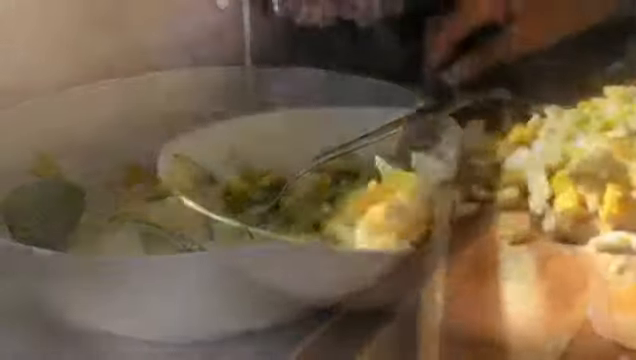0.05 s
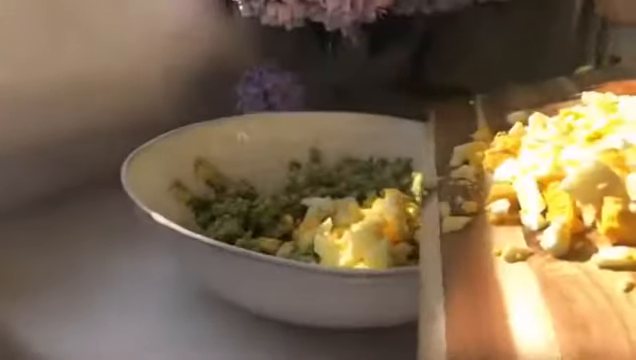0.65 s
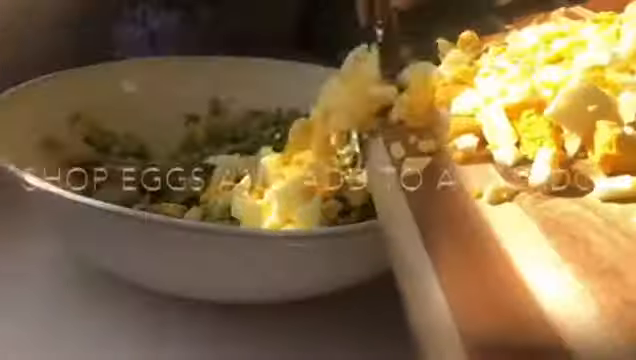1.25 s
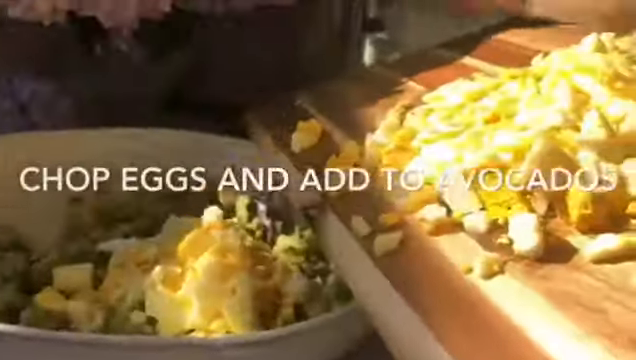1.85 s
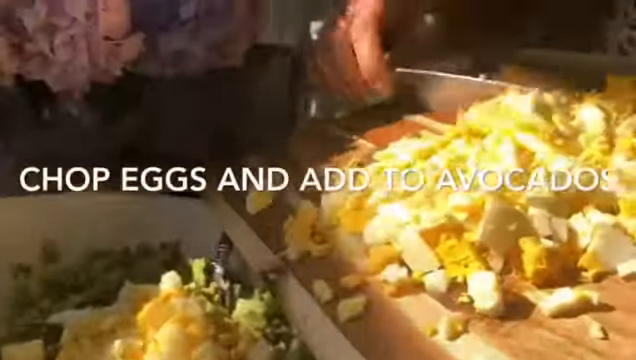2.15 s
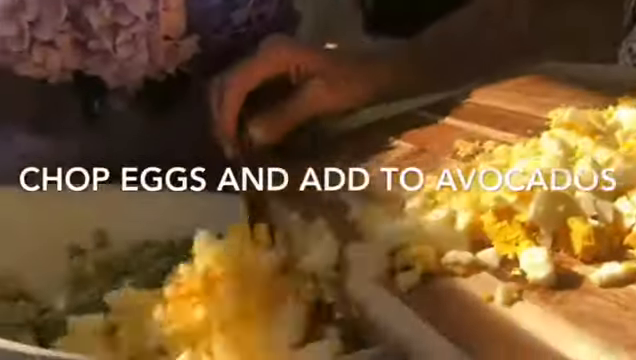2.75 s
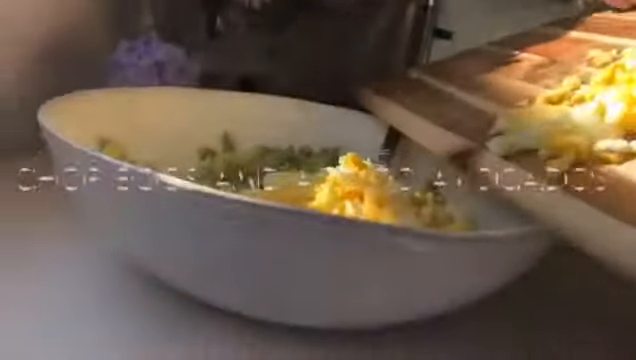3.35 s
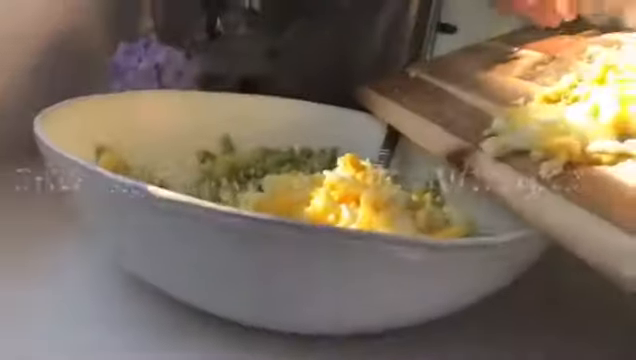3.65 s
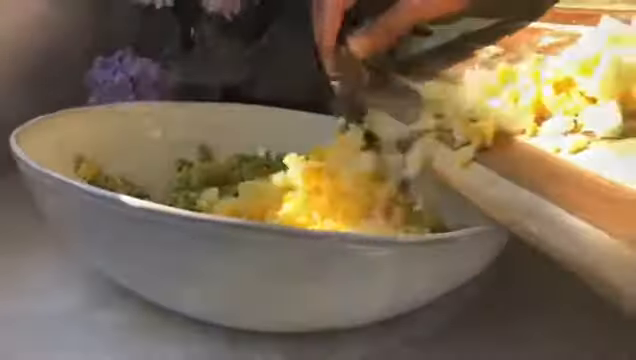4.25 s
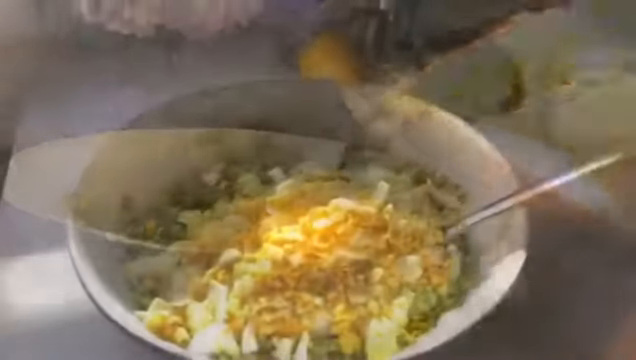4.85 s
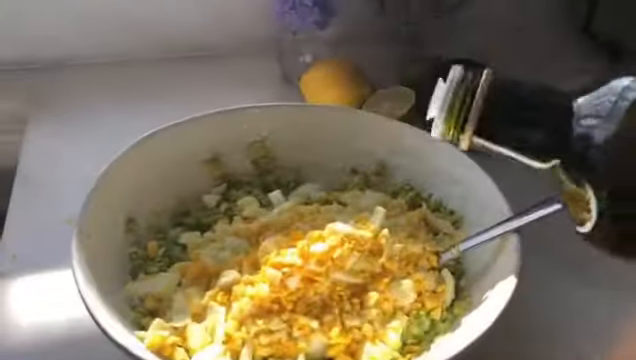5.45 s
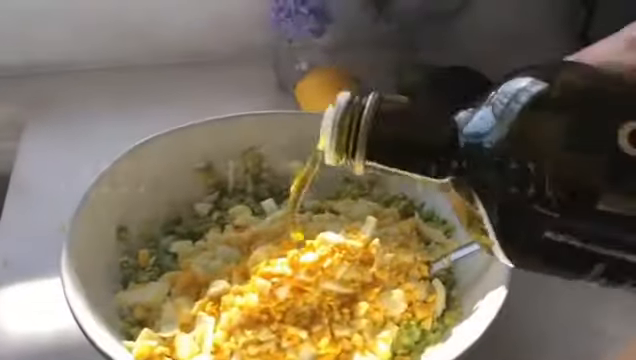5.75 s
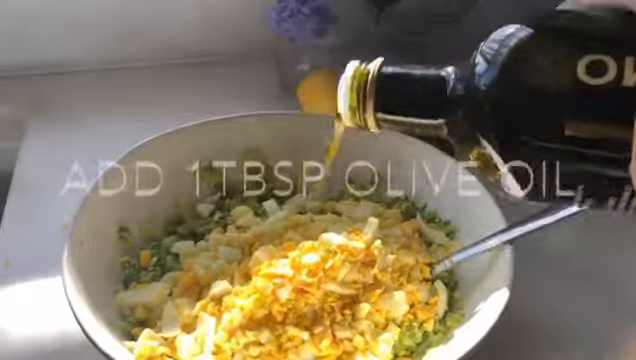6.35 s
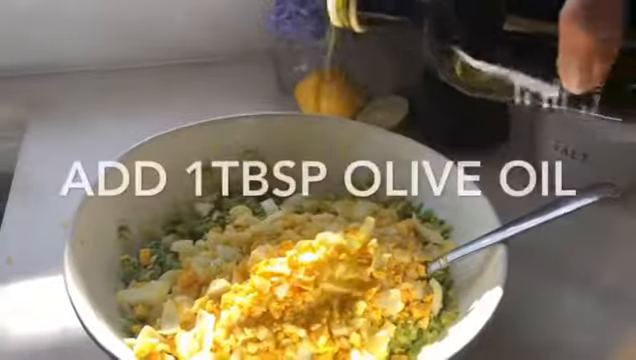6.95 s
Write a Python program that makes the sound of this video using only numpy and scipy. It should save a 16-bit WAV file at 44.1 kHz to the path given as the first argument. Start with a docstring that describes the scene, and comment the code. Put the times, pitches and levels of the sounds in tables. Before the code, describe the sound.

Close, rasping knife scrapes and sharp knocks on a wooden cutting board, with moist egg dropping into a bowl.

```python
"""In a small kitchen, close by, a knife pushes chopped egg off a wooden board into a bowl.
The blade lands with a hard knock, then catches on the wood fibres, so that it rasps and squeaks
and both wood and steel ring. Soft lumps drop into the bowl with wet smacks. Near the end only
a few tiny wet ticks are left over the low rumble and hollow drone of the room."""
import sys
import numpy as np
from scipy import signal
from scipy.fft import rfft, irfft, next_fast_len
from scipy.io import wavfile
from scipy.ndimage import uniform_filter1d, minimum_filter1d, map_coordinates

SR = 44100
rng = np.random.default_rng(int(sys.argv[2]) if len(sys.argv) > 2 else 0)


def to_wav(sig):
    """Store sig (one row per channel, or 1-D mono) as 16-bit WAV at the path in sys.argv[1].

    Samples outside -1..1 are clipped; the rate is SR.
    """
    pcm = np.clip(np.atleast_2d(sig), -1, 1) * 32767
    pcm = np.round(pcm).astype(np.int16)
    wavfile.write(sys.argv[1], SR, pcm.T)  # frames by channels


N = 316879
TIME = np.arange(N) / SR


def from_db(db):
    """Turn decibels into a number to multiply by."""
    return 10 ** (np.asarray(db) / 20)


def rms_one(x):
    """Scale a sound so that its average power is 1."""
    return x / np.sqrt(np.mean(x ** 2) + 1e-20)


def cut(x, hz, kind, order=2):
    """Keep the "low" or the "high" side of hz."""
    return signal.sosfilt(signal.butter(order, hz, kind, fs=SR, output="sos"), x + 1e-18)


def resonate(x, hz, width_hz):
    """Ring at one pitch; the narrower the width, the longer the ring."""
    r = np.exp(-np.pi * width_hz / SR)
    feedback = [1, -2 * r * np.cos(2 * np.pi * hz / SR), r * r]
    return signal.lfilter(np.array([1, 0, -1]) * (1 - r * r) / 2, feedback, x + 1e-18)


def body(x, modes):
    """An object rings at several pitches of its own, its modes; every second one is flipped in sign."""
    return sum((-1) ** k * from_db(db) * resonate(x, hz, width)
               for k, (hz, width, db, *_) in enumerate(modes))


def drift(per_s):
    """A random wobble that takes per_s new values a second."""
    return np.interp(TIME * per_s, np.arange(4000), rng.standard_normal(4000))


def burst(start, fade_s):
    """A level that jumps up at start and dies away."""
    out, at = np.zeros(N), round(start * SR)
    out[at:at + SR // 2] = np.exp(-TIME[:min(SR // 2, N - at)] / fade_s)
    return out


def grit(per_s, spread_db):
    """Many tiny clicks of uneven size at random times."""
    sizes = from_db(spread_db * np.minimum(rng.exponential(1, N), 4)) * rng.choice([-1, 1], N)
    return sizes * (rng.random(N) < per_s / SR)


def level_curve(points):
    """A level that slides from one (time, dB) point to the next."""
    return from_db(np.interp(TIME, *np.transpose(points)))


# how strong the air noise is from low to high: f/Hz, level/dB
AIR_COLOUR = [(25, -29), (50, -4.5), (90, -4.5), (200, -13), (280, -12), (420, -15), (700, -24),
              (1000, -24), (1500, -32), (2200, -36.5), (3000, -37.5), (5300, -43.5), (7000, -44),
              (12000, -48.5)]
# the background hiss dips briefly, then stays a little quieter: t/s, level/dB
AIR_LEVELS = [(0, -50), (1.5, -51.5), (4.3, -50.5), (4.7, -55.5), (5.2, -53), (7.19, -53)]
def air():
    """The still air of the kitchen is a dull, soft noise."""
    hz, db = np.transpose(AIR_COLOUR)
    size = next_fast_len(N)
    colour = from_db(np.interp(np.log(np.fft.rfftfreq(size, 1 / SR) + 1), np.log(hz), db))
    noise = irfft(rfft(rng.standard_normal(size)) * colour, size)[:N]
    return level_curve(AIR_LEVELS) * rms_one(cut(noise, 28.95, "high"))


# the deep pitches in the rumble: f/Hz, width/Hz, level/dB
RUMBLE_MODES = [(56, 10, 1), (137.4, 32, 1), (109, 20.8, -7.5)]
# its rise and fall: t/s, level/dB
RUMBLE_LEVELS = [(0, -55), (0.7, -49.5), (2.8, -50), (4.1, -46.5), (4.7, -53.5), (7.19, -55)]
def rumble():
    """A low rumble swells and sinks again."""
    deep = cut(body(rng.standard_normal(N), RUMBLE_MODES), 200, "low")
    return level_curve(RUMBLE_LEVELS) * rms_one(cut(deep, 42, "high", order=4))


# low pitches at which the room rings: f/Hz, width/Hz, level/dB
DRONE_MODES = [(135, 12, 3.5), (261, 25, -1.5), (295, 25, -5), (362, 36, -3.5)]
# the drone comes up toward the end: t/s, level/dB
DRONE_LEVELS = [(0, -74.5), (4.6, -70.5), (5.2, -53), (7.19, -55.5)]
def drone():
    """Noise ringing in the room makes a hollow drone."""
    hollow = cut(body(rng.standard_normal(N), DRONE_MODES), 450, "low", order=4)
    return level_curve(DRONE_LEVELS) * rms_one(hollow)


def kitchen(x, tail_db, low_t60_s=.5, high_t60_s=.37):
    """Add quick echoes off worktop and bowl, then the room's tail; t60 is the time to fade by 60 dB."""
    t = TIME[:SR // 2]
    noise = rng.standard_normal((3, len(t)))
    early = noise[0] * (t > .003) * np.exp(-t / .0095)
    low_fade, high_fade = from_db(-60 * t / low_t60_s), from_db(-60 * t / high_t60_s)
    tail = cut(noise[1], 3000, "low") * low_fade + cut(noise[2], 3000, "high") * high_fade
    tail *= (t > .008) / np.linalg.norm(low_fade)
    echoes = from_db(-16) * early / np.linalg.norm(early) + from_db(tail_db) * tail
    return x + signal.fftconvolve(x, echoes)[:N]


# pitches that linger in the room, lowest first: f/Hz, t60/s, level/dB
LINGERING_PITCHES = [(250, .35, 1), (571, .5, 3), (1358, .45, -5), (2385, .4, -1), (2470, .4, -7),
                     (4040, .3, -4), (5270, .3, -4), (6680, .4, -8), (6968, .4, -7), (10145, .2, -4)]
def linger(x, lowest=None):
    """The pitches of board and blade linger in the room after the knife stops."""
    return x + sum(from_db(db) * resonate(x, hz, np.log(1000) / (np.pi * t60))
                   for hz, t60, db in LINGERING_PITCHES[:lowest])


def squelches(rows, relative_width, pops_per_s):
    """Each wet sound is a fading cluster of tiny pops around one pitch."""
    pops, out = grit(pops_per_s, spread_db=2.5), np.zeros(N)
    for start, db, hz, fade_s in rows:
        width = hz * relative_width
        cluster = resonate(pops * burst(start, fade_s), hz, width)
        out += from_db(db) * cluster / np.std(resonate(pops[:SR], hz, width))
    return out


# tiny wet ticks in the bowl: t/s, level/dB, f/Hz, fade/s
WET_TICKS = [(4.7538, -65.5, 2960, 0.0044), (5.785, -63, 4800, 0.0071), (5.80, -63, 2000, .008),
             (6.1905, -58.5, 5000, 0.0033), (6.192, -62.5, 3330, 0.0046), (6.7767, -62, 2010, 0.0062)]
def ticks():
    """Little air pockets pop in the oily food."""
    return squelches(WET_TICKS, relative_width=.053, pops_per_s=26000)


# smacks of egg: t/s, level/dB, f/Hz, fade/s
EGG_SMACKS = [(2.33, -55.5, 4440, 0.066), (2.943, -46, 2443, 0.052), (2.946, -53, 4720, 0.075),
              (3.015, -60.5, 5020, 0.0092), (3.096, -55, 5476, .008), (4.2205, -43.5, 4200, 0.0044),
              (4.415, -66, 5980, .06)]
def smacks():
    """Wet egg makes short, bright smacks."""
    return cut(squelches(EGG_SMACKS, relative_width=.52, pops_per_s=4000), 7000, "low", order=4)


# falling lumps: t/s, level/dB, f/Hz, fade/s
EGG_LUMPS = [(2.293, -34, 480, 0.034), (2.309, -44, 600, 0.014), (2.345, -57, 500, 0.033),
             (2.522, -44.5, 350, .01), (2.985, -47, 1000, .04), (3.046, -48, 880, 0.02)]
def lumps():
    """Soft lumps of egg land in the bowl with a dull plop."""
    return cut(squelches(EGG_LUMPS, relative_width=.71, pops_per_s=2700), 3000, "low")


def rubbed(snags, modes, wander_db=2.1):
    """As the knife moves along, each mode is fed now a little more, now a little less."""
    return sum((-1) ** k * from_db(db + wander_db * drift(18)) * resonate(snags, hz, width)
               for k, (hz, width, db, *_) in enumerate(modes))


# the board with the knife on it: f/Hz, width/Hz, rubbed level/dB, struck level/dB
BOARD_MODES = [(255, 15.65, -10.5, -35.5), (371, 33, -12.5, -34), (485, 40, -20.5, -32.5),
               (564, 25, -4, -35), (782, 27, -7.5, -28), (895, 70, -23, -25), (1036, 45, -12.5, -21),
               (1142, 74, -7.5, -28), (1354, 35, 4, -16.5), (1575, 90, -3, -24), (1785, 60, -7.5, -15.5),
               (2484, 78, -18, -22.5)]
def board_ring(snags, low_drive, high_drive, split_hz=980):
    """Snags shake the board, which answers with hollow low notes and woody higher ones."""
    low = [mode for mode in BOARD_MODES if mode[0] < split_hz]
    high = [mode for mode in BOARD_MODES if mode[0] >= split_hz]
    ring = rubbed(snags * low_drive, low) + rubbed(snags * high_drive, high)
    return ring / np.std(body(snags, high))


# the knife's edge: f/Hz, width/Hz, rubbed level/dB, tapped level/dB
EDGE_MODES = [(2413, 170, 3.5, 0.5), (2674, 53, 1.5, -22), (2770, 31, -1, -26), (3060, 200, 3.5, -3.5),
              (3555, 500, -5, -10), (4083, 110, 1.5, -4.5), (4350, 700, -6.5, -14), (5095, 250, -3, -6),
              (5323, 200, -0.5, -3.5)]
def edge_hiss(snags, drive):
    """The rasping edge rings, with plain rubbing noise mixed in."""
    ring = rubbed(snags * drive, EDGE_MODES) / np.std(body(snags, EDGE_MODES))
    rubbing = cut(cut(snags * drive, 1900, "high"), 5600, "low")
    rubbing /= np.std(cut(cut(snags, 1900, "high"), 5600, "low"))
    return ring + from_db(-5) * rubbing


# the steel blade: f/Hz, width/Hz, level/dB
BLADE_MODES = [(6700, 91, -4), (7020, 82, -2), (7320, 730, -12), (8350, 50, -6), (9000, 1400, -16.5),
               (9500, 100, -15), (9856, 200, -14.5), (10260, 90, -11.5), (10580, 200, -16.5)]
def blade_ring(snags, drive):
    """Snags make the steel ring, thin and high."""
    ring = cut(rubbed(snags * drive, BLADE_MODES), 5400, "high")
    return ring / np.std(body(snags, BLADE_MODES))


def along_blade(x, trip_s=.0014, swing_s=.00012, share=.42):
    """Shaking runs to the blade's end and back; the trip changes as the touching point moves."""
    echo = map_coordinates(x, [(TIME - trip_s - swing_s * drift(9)) * SR], order=3)
    return (x + share * echo) / np.hypot(1, share)


# light touches of the edge: t/s, level/dB
EDGE_TAPS = [(0.0150, -31.5), (0.1092, -25), (2.189, -30), (2.542, -38), (3.739, -35.5), (3.755, -31),
             (4.233, -42.5), (4.3111, -42), (4.9108, -25)]
def taps():
    """The edge catches for a moment and sets wood and steel ringing."""
    touch = rng.standard_normal(N) * sum(from_db(db) * burst(start, .0045) for start, db in EDGE_TAPS)
    board = from_db(13) * body(touch, BOARD_MODES)
    edge = from_db(5) * body(touch, [(hz, width, db) for hz, width, _, db in EDGE_MODES])
    return board + edge + from_db(8) * body(touch, BLADE_MODES)


# squeaks of the edge: start t/s, end t/s, start f/Hz, end f/Hz, level/dB
EDGE_SQUEAKS = [(0.003, 0.065, 8400, 8100, -54.5), (0.73, 0.805, 4100, 3900, -43.5),
                (0.79, 0.88, 3400, 3095, -39), (0.818, 0.962, 8450, 8300, -48),
                (0.936, 1.124, 4380, 4260, -47), (2.217, 2.319, 2470, 2457, -42.5),
                (2.24, 2.308, 1333, 1220, -39.5), (2.674, 2.735, 7220, 7500, -41),
                (2.677, 2.766, 6900, 6433, -41.5), (3.771, 3.926, 3550, 3470, -45),
                (3.786, 3.978, 1342, 1360, -40), (4.972, 5.125, 8530, 8280, -58.5)]
def squeaks(width_hz=240):
    """The edge sticks and slips at an almost even rate: a hoarse, gliding squeak."""
    out = np.zeros(N)
    for start, end, start_hz, end_hz, db in EDGE_SQUEAKS:
        at = np.flatnonzero((TIME > start) & (TIME < end))
        progress = np.linspace(0, 1, len(at))
        phase = 2 * np.pi * np.cumsum(start_hz + (end_hz - start_hz) * progress) / SR
        rough = rms_one(cut(rng.standard_normal((2, SR // 2)), width_hz / 2, "low"))[:, :len(at)]
        swell = np.sqrt(np.abs(np.sin(np.pi * progress)))
        out[at] += from_db(db) * swell * (rough[0] * np.cos(phase) + rough[1] * np.sin(phase))
    return out


# pushes of the knife: t/s, length/s, speeding up/s, slowing down/s, level/dB, pressure gained/dB,
# then extras set by where and how steeply the edge sits: board/dB, blade/dB, low board notes/dB
KNIFE_PUSHES = [ (0.026, 0.080, .005, .008, -47.5, 6, 2, 3, -4),
                (0.675, 0.262, 0.043, 0.061, -39, -1.5, -2.5, 2, 1.5),
                (0.911, 0.12, 0.038, 0.012, -40, 3.5, 1, 4.5, 1),
                (1.027, 0.2, .025, 0.0089, -39, -2.5, -3, 5.5, 2),
                (1.237, 0.056, 0.019, 0.049, -44.5, -3, -4.5, 5, -8.5),
                (1.946, 0.16, 0.083, 0.037, -40, 1.5, 0, 0.5, 1),
                (2.105, 0.082, 0.0094, .020, -66, -4, 14.5, -13, -2),
                (2.178, 0.19, 0.073, 0.12, -41.5, -3, 3, 2, -3),
                (2.539, 0.22, 0.0026, 0.017, -41.5, -1, -2, -0.5, -7),
                (2.764, 0.054, .034, .012, -38.5, -2, -3.5, 3, -7),
                (3.391, 0.15, 0.0075, .014, -43.5, 4, 1, -2.5, 3),
                (3.532, 0.19, 0.0084, 0.016, -49.5, -6.5, 6, -7, -3),
                (3.756, 0.28, 0.013, 0.083, -37.5, -0.5, -2, 2, 0),
                (4.916, 0.23, .035, 0.11, -54, -1, -3, 0, 2.5)]
def pushes():
    """Speed and pressure set how hard each part is shaken: wood sounds first, steel only at speed."""
    low, wood, edge, steel = np.zeros((4, N))
    for start, length, rise_s, fall_s, db, lean_db, board_db, blade_db, low_db in KNIFE_PUSHES:
        t = TIME - start
        speed = np.sin(np.pi / 2 * np.clip(np.minimum(t / rise_s, (length - t) / fall_s), 0, 1))
        force = from_db(db + lean_db * (np.clip(t / length, 0, 1) - .5))
        on_board = force * from_db(board_db) * speed ** .811
        low += on_board * from_db(low_db)
        wood += on_board
        edge += force * speed ** 1.5
        steel += force * from_db(blade_db) * speed ** 2
    uneven = from_db(1.2 * drift(35))  # the hand presses unevenly
    rocking = from_db(1.2 * drift(22))  # the edge rocks: more wood, then more steel
    return uneven * np.array([low * rocking, wood * rocking, edge, steel / rocking])


def scrape(judder_db=1.86):
    """The edge snags on wood fibres, sticking and slipping; this shakes board, edge and blade."""
    snags = grit(per_s=5500, spread_db=2.9) * from_db(judder_db * drift(220))
    low, wood, edge, steel = pushes()
    board = board_ring(snags, low, wood)
    knife = from_db(-2) * edge_hiss(snags, edge) + from_db(-.5) * blade_ring(snags, steel)
    return board + along_blade(knife)


# the knife lands or bounces: t/s, level/dB, knock f/Hz, brightness f/Hz, extra ring/dB, extra thud/dB
KNIFE_LANDINGS = [(0.155, -21.5, 1555, 3270, 6, 13), (0.671, -1, 1552, 2560, 5, 7.5),
                  (1.9250, 4, 1562, 3170, 4, -0.5), (3.3750, 4, 1590, 2920, -1.5, -8),
                  (3.3854, -12, 1650, 2013, 1.5, 8), (4.2649, -37, 1420, 3000, 9, 19.5),
                  (4.9103, -32, 1390, 5000, 6, 3)]
def knocks(half_width_hz=235, thud_below_hz=650):
    """Each landing makes a short, dead knock, a crack of the edge and a ring of the board."""
    out, cracks, blows, thuds = np.zeros((4, N))
    for start, db, hz, bright_hz, ring_db, thud_db in KNIFE_LANDINGS:
        click = signal.unit_impulse(N, round(start * SR))
        band = signal.butter(3, [hz - half_width_hz, hz + half_width_hz], "band", fs=SR, output="sos")
        knock = signal.sosfilt(band, click + 1e-18)
        out += from_db(db) * knock / np.max(np.abs(knock))
        cracks += from_db(db) * cut(rng.standard_normal(N) * burst(start, .0062), bright_hz, "low")
        contact = cut(click, bright_hz, "low")
        blows += from_db(db + ring_db) * contact
        thuds += from_db(db + thud_db) * contact
    for k, (hz, width, _, db) in enumerate(BOARD_MODES):
        ring = resonate(thuds if hz < thud_below_hz else blows, hz, width)
        scale = SR / (2 * np.pi * width)  # a click of size 1 rings at height 1
        out += (-1) ** k * from_db(db) * scale * ring
    out += from_db(-25) * cracks
    out += from_db(-12) * body(cracks, EDGE_MODES) + from_db(-14) * body(cracks, BLADE_MODES)
    return out - .81 * resonate(out, 2020, 260)  # the board hardly moves between two of its modes


def scene():
    """Knife, board and egg echo in the kitchen, over its quiet background."""
    egg = lumps() + smacks()
    rasp = linger(scrape() + squeaks() + taps())
    landings = linger(knocks(), lowest=2)  # just the two deepest pitches
    mix = kitchen(rasp, tail_db=-11) + kitchen(landings, tail_db=-14.5)
    mix += kitchen(egg + ticks(), tail_db=-11)
    return (mix + air() + rumble() + drone())[None]


def record(dry, limit=1.2):
    """The microphone loses the highest treble; a fast limiter and slight overload flatten hard knocks."""
    heard = signal.sosfilt(signal.ellip(8, .5, 60, 11500, fs=SR, output="sos"), dry)
    allowed = limit / np.maximum(np.abs(heard), limit)
    gain = uniform_filter1d(minimum_filter1d(allowed, size=31), size=31)
    clipped = np.clip(heard * gain, -1, 1)
    return signal.sosfilt(signal.ellip(10, .1, 80, 16400, fs=SR, output="sos"), clipped)


dry = scene()
out = record(dry)
to_wav(out)
```